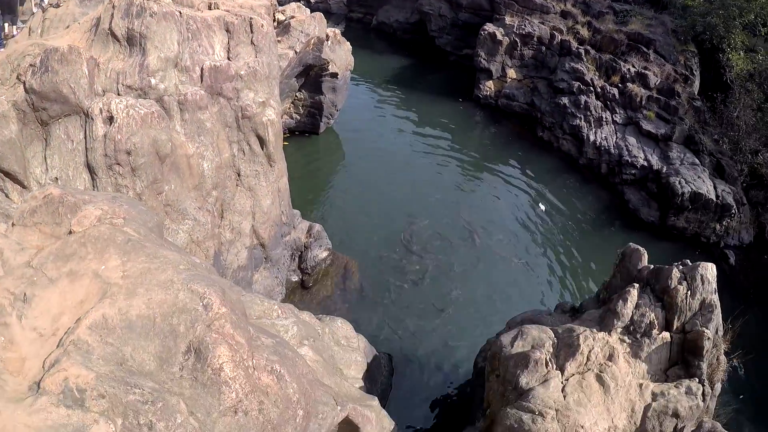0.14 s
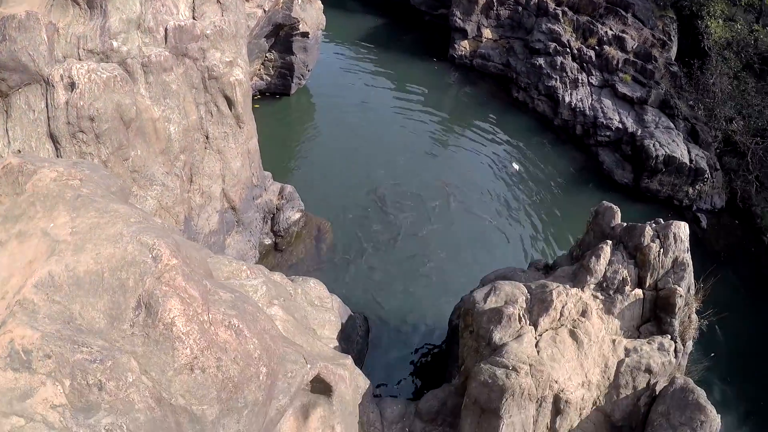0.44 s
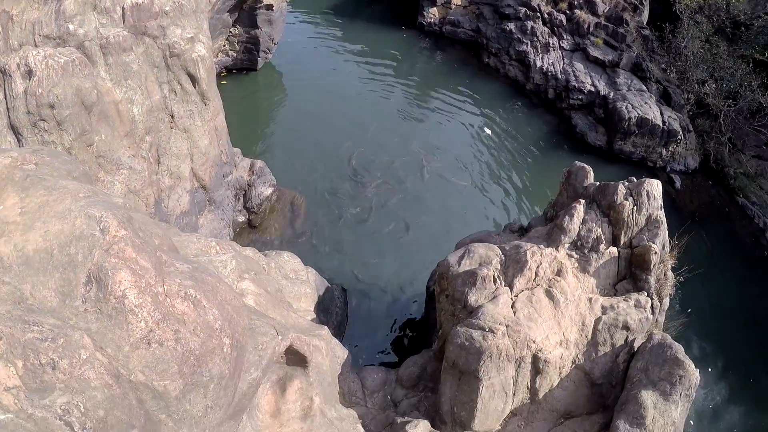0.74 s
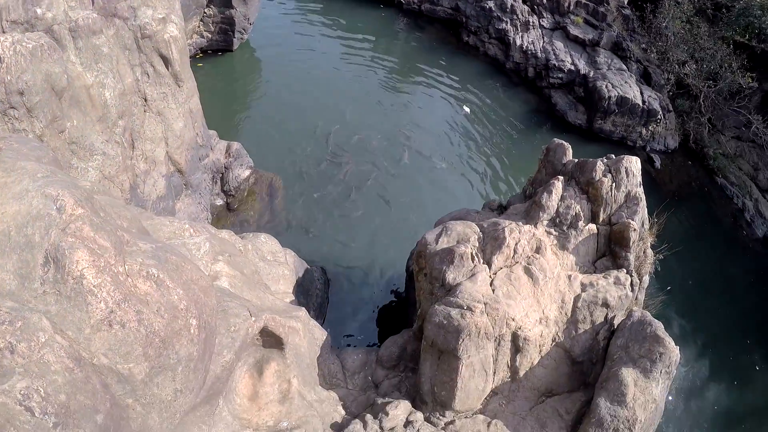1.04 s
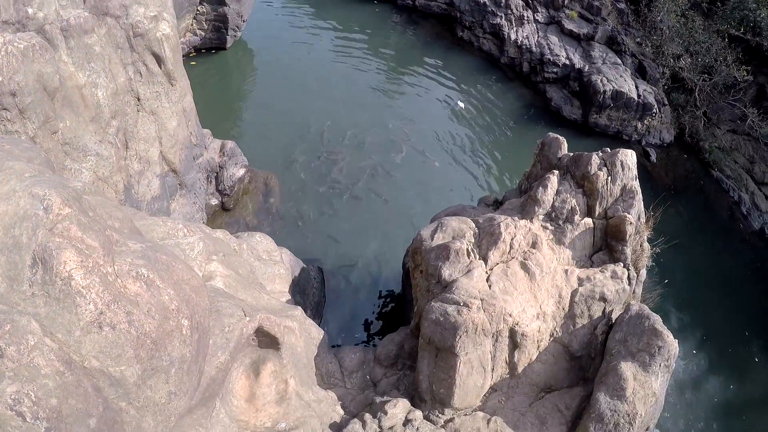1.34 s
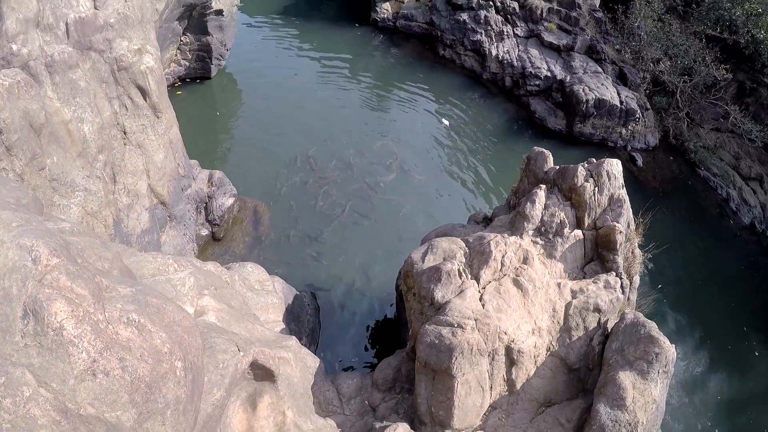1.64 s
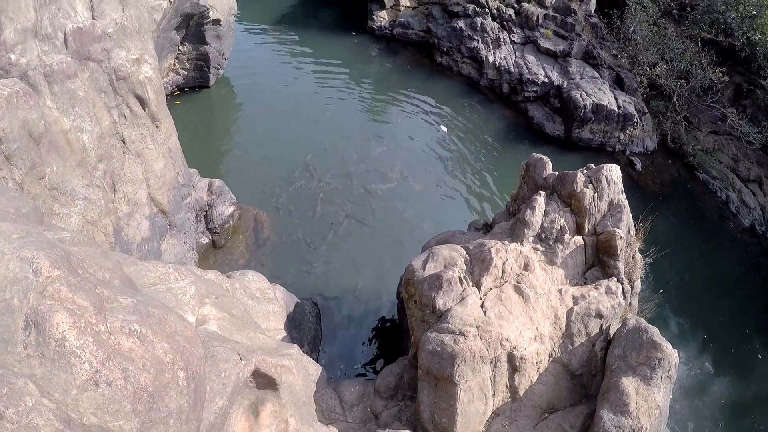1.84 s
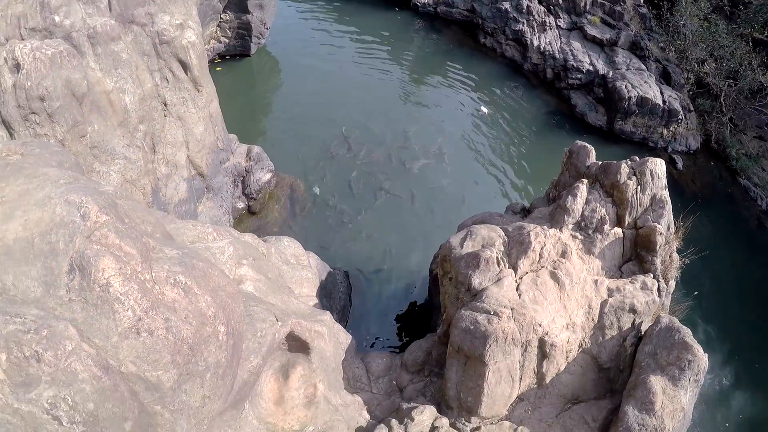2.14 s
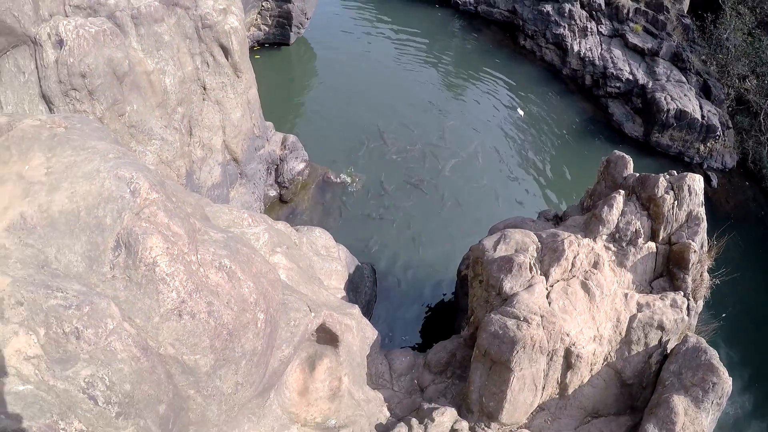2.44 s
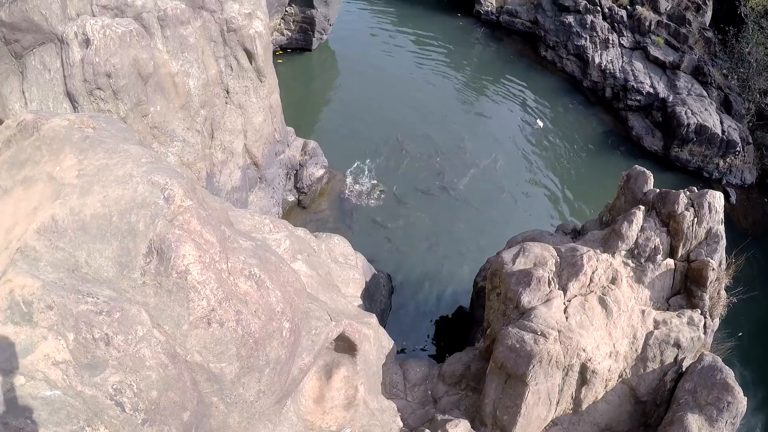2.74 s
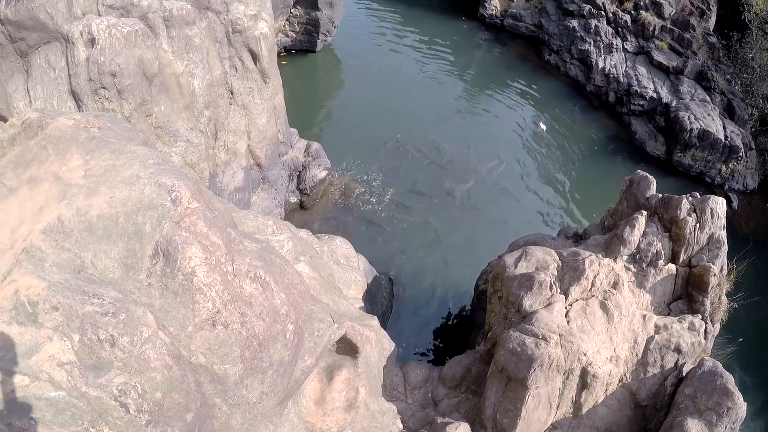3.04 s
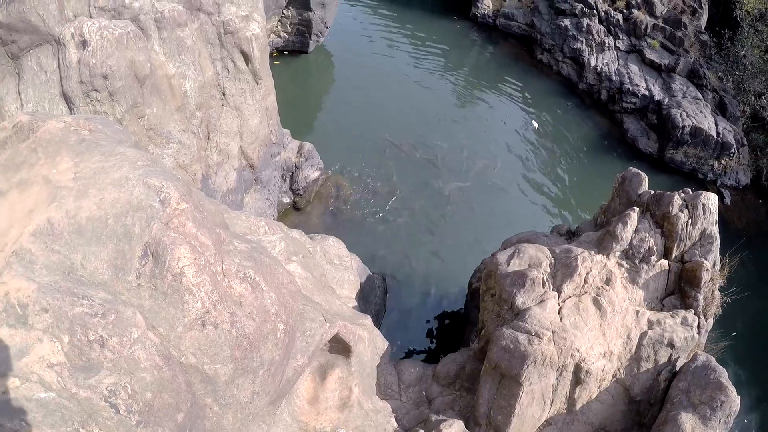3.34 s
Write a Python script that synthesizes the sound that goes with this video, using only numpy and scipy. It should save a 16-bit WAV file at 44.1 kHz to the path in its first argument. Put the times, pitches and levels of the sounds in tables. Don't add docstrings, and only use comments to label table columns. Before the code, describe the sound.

A plunge into a rock pool with spray and bubbles, over wind rumble and birds

```python
import sys
import numpy as np
from scipy import signal
from scipy.io import wavfile
from scipy.ndimage import uniform_filter1d

SR = 44100
rng = np.random.default_rng(int(sys.argv[2]) if len(sys.argv) > 2 else 0)


def convert_level_to_amplitude(level_db):
    exponent = np.asarray(level_db, float) / 20
    return 10 ** exponent


def transcribe(u):
    v = np.clip(np.atleast_2d(u).T, -1, 1)
    q = np.round(v * 32767).astype(np.int16)
    wavfile.write(sys.argv[1], SR, q)


N = 154791

# pitch_hz, level_db (per Hz)
RUMBLE_COLOUR = [(7.1, -16.5), (12, -8.5), (32, 1), (55, -1), (77, -3.5), (98, -15), (123, -18), (162, -27),
                 (200, -36.5), (260, -63), (440, -120)]
RIVER_COLOUR = [(88, -41), (150, -0.5), (220, -6), (282, -1), (442, -5.5), (596, -14.5), (900, -23.5),
                (1170, -41), (1980, -120)]
HISS_COLOUR = [(500, -21.5), (900, -0.5), (1500, -5), (2900, -5), (3600, -7), (6500, -11), (7500, -14.5),
               (15300, -19.5)]
RUSTLE_COLOUR = [(1500, -18), (3500, -3), (5500, 1), (8000, -8), (15000, -15)]
SPRAY_COLOUR = [(400, -36), (750, -1.5), (1500, -6.5), (2400, -5.5), (2950, .5), (3600, -7.5),
                (6500, -14.5), (7600, -25.5), (15000, -25)]
# time_s, level_db
WIND_STRENGTH = [(0.0, -35), (0.03, -33.5), (0.17, -37.5), (1.04, -37), (1.07, -34.5), (1.15, -39),
                 (1.21, -47), (1.27, -40), (1.7, -39.5), (1.84, -36.5), (2.4, -38.5), (2.55, -35.5),
                 (2.7, -38), (3.49, -38), (3.5, -33)]
# time_s, level_db
SPRAY_STRENGTH = [(0, -61), (.04, -80), (1.02, -75), (1.12, -65), (1.25, -70.5), (1.4, -76.5),
                  (2.48, -69.5), (2.5, -60), (2.6, -56.5), (2.78, -53), (2.9, -58.5), (3.0, -60.5),
                  (3.1, -74), (3.51, -70)]
# start_s, peak_db, top_pitch_hz, lower_voice_db (relative to the main voice)
BIRD_CHIPS = [(.648, -66, 6270, -14), (1.582, -69, 6550, -12), (1.653, -67, 6700, -14),
              (1.726, -67, 6600, -14), (1.775, -54.5, 6530, -1.5), (2.279, -62, 7100, -4),
              (2.379, -53.5, 6670, -6), (2.531, -51.5, 6400, -14), (2.6, -47, 6700, -8.5),
              (2.677, -54, 6320, -2), (2.766, -46.5, 6620, -6), (3.045, -48, 6760, -4),
              (3.434, -51, 6600, -6)]
# time_s, pitch_hz, level_db
BIRD_SWOOP = [
    (1.288, 6000, -72),
    (1.3, 6600, -66),
    (1.312, 6400, -70),
    (1.322, 5500, -60),
    (1.335, 4930, -64),
    (1.355, 4000, -73),
]
# start_s, length_s, pitch_hz, level_db
BIRD_WHISTLES = [
    (1.03, .27, 3830, -69.5),
    (1.03, .22, 2900, -73),
    (1.47, .08, 3900, -73),
    (2.13, .05, 6600, -74),
]
# start_s, peak_db, pitch_hz, width_hz
DROP_TICKS = [(0.2975, -41, 1150, 900), (.298, -50, 3000, 2500), (.311, -55, 1800, 2500),
              (.334, -45, 2600, 2200), (.333, -49, 900, 900), (.345, -54, 3500, 1500),
              (1.144, -50, 6900, 2500), (1.145, -52, 12500, 4000), (1.507, -44, 2600, 4000),
              (1.891, -41.5, 2020, 3000), (1.898, -41, 1100, 2200), (1.922, -50, 2960, 1200),
              (1.999, -41.5, 2500, 3500), (2.058, -39.5, 2400, 1300), (2.252, -48, 1750, 400),
              (2.254, -50, 2950, 700), (2.444, -46, 1200, 2000), (2.496, -37, 3020, 495),
              (2.504, -34.5, 1800, 2500), (2.507, -43.5, 3050, 707), (2.629, -44, 1500, 2000),
              (2.697, -39.5, 2970, 800), (2.931, -40, 2480, 4000), (3.001, -46, 3050, 900),
              (3.306, -40, 1460, 1800), (3.361, -53, 1800, 2500), (2.184, -60, 11500, 1500),
              (1.7825, -48, 13200, 900), (1.783, -52, 10700, 2200), (1.783, -52, 7800, 900),
              (1.783, -47, 5370, 700), (1.786, -48.5, 4000, 700), (2.061, -51, 900, 900),
              (2.062, -53, 6500, 4000), (2.677, -49, 2600, 2000), (2.775, -46, 2500, 2520),
              (2.785, -44, 2900, 1200), (2.815, -47, 3000, 900), (2.835, -46, 3200, 900),
              (2.883, -51, 3900, 700), (2.943, -48, 2900, 900), (3.427, -50, 2500, 2500),
              (3.466, -53, 2300, 2000), (3.506, -47, 2000, 4000)]
# start_s, peak_db, pitch_hz, width_hz, decay_s
SCUFFS_AND_SLAPS = [(.326, -50, 2900, 500, 0.012), (.33, -49, 470, 570, 0.0088),
                    (.646, -50.5, 5700, 3000, 0.0045), (1.503, -50, 744, 500, 0.01),
                    (1.781, -54, 14000, 3000, 0.006), (2.056, -47, 370, 160, 0.02),
                    (1.76, -55, 5950, 380, 0.013), (1.761, -52, 4500, 700, 0.011),
                    (2.492, -45, 930, 290, 0.012), (2.276, -53.5, 5400, 5000, .012),
                    (2.554, -47, 810, 560, .01), (2.568, -51, 2950, 530, .025), (2.625, -52, 900, 360, .02),
                    (2.598, -50.5, 10800, 6050, .008), (2.679, -48, 6200, 3500, .006),
                    (2.772, -49, 4000, 6000, 0.0089), (2.92, -44.5, 2000, 1850, .02),
                    (3.147, -48, 930, 1200, 0.015), (3.046, -56, 9000, 5000, .006)]
# start_s, peak_db, pitch_hz, length_s
AIR_BUBBLES = [(.825, -45, 439, .1), (1.01, -54, 435, 0.062), (0.797, -52, 284, .12),
               (2.502, -30.5, 368, .04), (2.527, -44, 386, 0.044), (2.555, -34, 412, 0.015),
               (2.562, -45, 524, 0.015), (2.056, -43, 330, .026), (2.07, -43, 430, .02),
               (2.079, -50, 540, .016), (1.892, -46, 290, .03), (2.918, -52, 1750, .01),
               (3.132, -53, 1000, .012), (2.673, -52, 1420, .012), (2.665, -55, 650, .015),
               (3.39, -49.5, 289.6, .06), (2.534, -49, 1080, 0.015), (2.548, -49, 1540, 0.011),
               (2.598, -48, 390, .03), (2.608, -48.5, 1740, 0.0079), (2.625, -48, 1142, 0.013),
               (2.697, -45.5, 515, .02), (2.72, -43.5, 2210, 0.0098), (2.775, -50, 792, 0.021),
               (2.788, -49, 955, 0.014), (2.82, -50, 600, 0.023), (2.839, -56, 830, .016),
               (2.868, -42, 730, 0.01), (2.918, -49, 1190, 0.0094), (2.929, -47, 520, 0.012),
               (3.028, -53, 3920, 0.0084), (3.225, -58, 950, 0.024), (3.324, -65, 2700, .008),
               (3.023, -49.5, 255, 0.13)]
# start_s, end_s
TREBLE_GAPS = [(.04, .075), (.13, .34), (.43, .7), (1.0, 1.085), (1.68, 1.72), (1.795, 1.875), (1.96, 2.0),
               (2.068, 2.11), (2.27, 2.345), (3.1, 3.2), (3.395, 3.435)]


def evened(x):
    return x / np.sqrt(np.mean(x ** 2) + 1e-20)


def read(points, hz):
    f, value = np.transpose(points)
    return np.interp(np.log(hz + 1), np.log(f + 1), value)


def along(points):
    s, value = np.transpose(points)
    return np.interp(np.arange(N) / SR, s, value)


def add(mix, s, sound):
    part = mix[round(s * SR):][:len(sound)]
    part += sound[:len(part)]


def tone(hz):
    return np.sin(2 * np.pi * np.cumsum(hz) / SR)


def resonate(x, hz, width):
    turn = np.exp(2j * np.pi * hz * np.arange(len(x)) / SR)
    r = np.exp(-np.pi * width / SR)
    return 2 * (turn * signal.lfilter([1 - r], [1, -r], x / turn)).real


def band(x, hz, width):
    for _ in range(3):
        x = resonate(x, hz, width)
    return x


def noise(colour, patchy_db, size=1024):
    frames, hz = 4 * N // size + 5, np.fft.rfftfreq(size, 1 / SR)
    a, b, patches = rng.standard_normal((frames, len(hz), 3)).T
    patches = uniform_filter1d(patches, size=10, axis=0)
    patches = evened(uniform_filter1d(patches, size=10, axis=1))
    z = (a + 1j * b) * convert_level_to_amplitude(read(colour, hz)[:, None] + patchy_db * patches)
    return evened(signal.istft(z, nperseg=size, noverlap=3 * size // 4)[1][:N])


def flutter(length, smooth):
    return 1 + .3 * evened(uniform_filter1d(rng.standard_normal(length), size=smooth))


def wind_rumble(gust_db):
    rumble = noise(RUMBLE_COLOUR, 0.23, size=8192)
    squashed = rumble / (1 + .3 * abs(signal.hilbert(rumble)))
    return convert_level_to_amplitude(-35 + gust_db) * evened(squashed)


def distant_river(gust_db):
    wash = convert_level_to_amplitude(-54.5) * noise(RIVER_COLOUR, 1.34)
    hiss = convert_level_to_amplitude(-64.5) * noise(HISS_COLOUR, 1.0)
    return convert_level_to_amplitude(0.17 * gust_db) * (wash + hiss)


def grass_rustle():
    start_s, length_s, level_db = 1.02, 0.29, -66
    progress = np.clip((np.arange(N) / SR - start_s) / length_s, 0, 1)
    return convert_level_to_amplitude(level_db) * np.sin(np.pi * progress) * noise(RUSTLE_COLOUR, 1.9, size=256)


def far_birds():
    out = np.zeros(N)
    s, hz, db = np.transpose(BIRD_SWOOP)
    t = np.arange(s[0], s[-1], 1 / SR)
    call = convert_level_to_amplitude(np.interp(t, s, db)) * tone(np.interp(t, s, hz))
    add(out, s[0], call * flutter(len(t), 60))

    blur_hz, overtone_db = 120, -13
    for s, length, hz, db in BIRD_WHISTLES:
        w = np.arange(0, length, 1 / SR) / length
        breath = rng.standard_normal(len(w))
        whistle = evened(resonate(breath, hz, blur_hz))
        overtone = evened(resonate(breath, 2 * hz, 2 * blur_hz))
        add(out, s, convert_level_to_amplitude(db) * np.sqrt(np.sin(np.pi * w)) * (whistle + convert_level_to_amplitude(overtone_db) * overtone))
    return out


def chipping_birds():
    out = np.zeros(N)
    chip_s, low_s = 0.01346, 0.0168
    u = np.arange(0, chip_s, 1 / SR) / chip_s
    v = np.arange(0, low_s, 1 / SR) / low_s
    upsweep = .7 + .3 * np.sin(np.pi * .62 * u)
    arch = .72 * np.interp(v, [0, .6, 1], [0.74, 1, 0.505])
    for s, db, hz, low_db in BIRD_CHIPS:
        wobble = flutter(len(u), 30)
        swell = np.sin(np.pi * u ** 0.97) * wobble
        low_swell = np.sin(np.pi * v) * np.interp(v, u, wobble)
        add(out, s, convert_level_to_amplitude(db) * swell * tone(hz * upsweep))
        add(out, s - .001, convert_level_to_amplitude(db - 15) * swell * tone(1.2 * hz * upsweep))
        add(out, s + 0.0065, convert_level_to_amplitude(db + low_db) * low_swell * tone(hz * arch))
    return out


def ticks():
    out, t = np.zeros(N), np.arange(3000) / SR
    for s, db, hz, width in DROP_TICKS:
        click = t == 0
        rustle = convert_level_to_amplitude(-10) * rng.standard_normal(len(t)) * np.exp(-t / .003) * np.sqrt(width / SR)
        ring = band(click + rustle, hz, 1.24 * width)
        add(out, s, convert_level_to_amplitude(db) * ring / abs(ring).max())
    return out


def scuffs():
    out, t = np.zeros(N), np.arange(3000) / SR
    rise_s = .002
    for s, db, hz, width, decay in SCUFFS_AND_SLAPS:
        burst = rng.standard_normal(len(t)) * np.minimum(t / rise_s, 1) * np.exp(-t / decay)
        ring = band(burst, hz, 1.56 * width)
        add(out, s, convert_level_to_amplitude(db) * ring / abs(ring).max())
    return out


def bubbles():
    out = np.zeros(N)
    for s, db, hz, length in AIR_BUBBLES:
        u = np.arange(0, 2 * length, 1 / SR) / length
        rise = .13 * np.interp(hz, [350, 900], [0, 1])
        fade = np.minimum(u / .2, 1) * np.exp(-2.2 * u ** 2)
        add(out, s, convert_level_to_amplitude(db) * fade * tone(hz * (1 + rise * u)))
    return out


def spray():
    drops_per_s, spread_db, cycles, foam_db = 3500, 3.8, 8, -.5
    falls = rng.random(N) < drops_per_s / SR
    strength = falls * convert_level_to_amplitude(spread_db * np.minimum(rng.exponential(1, N), 4))
    kind, out = rng.integers(0, 30, N), np.zeros(N)
    for k, hz in enumerate(np.geomspace(600, 13000, 30)):
        u = np.arange(int(3 * cycles * SR / hz)) * hz / SR / cycles
        grain = u * np.exp(-3 * u) * tone(hz * (1 + .1 * u))
        droplet = convert_level_to_amplitude(read(SPRAY_COLOUR, hz)) * np.sqrt(hz) * grain / np.linalg.norm(grain)
        out += signal.oaconvolve(strength * (kind == k), droplet)[:N]
    foam = convert_level_to_amplitude(foam_db) * noise(SPRAY_COLOUR, 2.5, size=256)
    return convert_level_to_amplitude(along(SPRAY_STRENGTH)) * evened(evened(out) + foam)


def gorge(x):
    t60_s = 0.2
    at = np.arange(300, SR // 2, 30)
    taps = np.zeros(SR // 2 + 30)
    signs = rng.choice([-1., 1.], len(at))
    taps[at + rng.integers(0, 30, len(at))] = signs * convert_level_to_amplitude(-60 * at / SR / t60_s)
    return signal.fftconvolve(x, taps / np.linalg.norm(taps))[:N]


def scene():
    gust_db = along(WIND_STRENGTH) + 36.5
    air = wind_rumble(gust_db) + distant_river(gust_db) + grass_rustle()
    birds = far_birds() + chipping_birds()
    water = ticks() + scuffs() + bubbles()
    echo = gorge(convert_level_to_amplitude(-7.5) * birds + convert_level_to_amplitude(-12) * water)
    return (air + birds + water + spray() + echo)[None]


def top_cut(x):
    return signal.sosfilt(signal.butter(12, 15410, fs=SR, output="sos"), x)


def record(dry):
    hz, t, z = signal.stft(dry, SR, nperseg=512)
    hz = hz[:, None]
    in_gap = sum((t > a) & (t < b) for a, b in TREBLE_GAPS)
    lost = in_gap * (hz > 13000) * (rng.random(z.shape[1:]) > .1)
    mix = signal.istft(z * (1 - lost) * (hz < 15300), SR, nperseg=512)[1][:, :N]
    return top_cut(mix)


dry = scene()
out = record(dry)
transcribe(out)
```